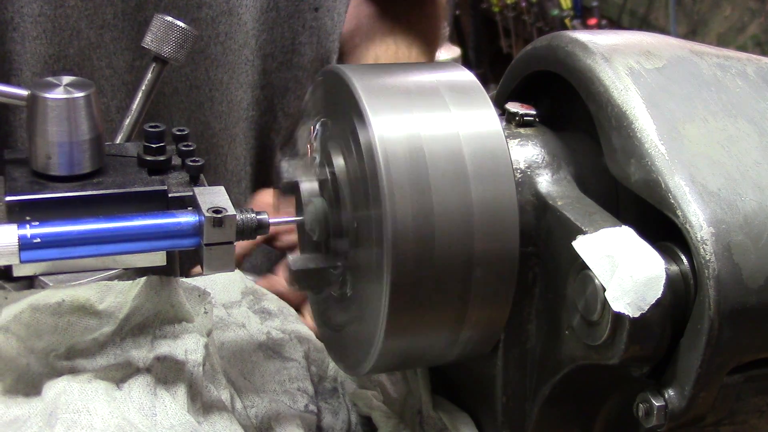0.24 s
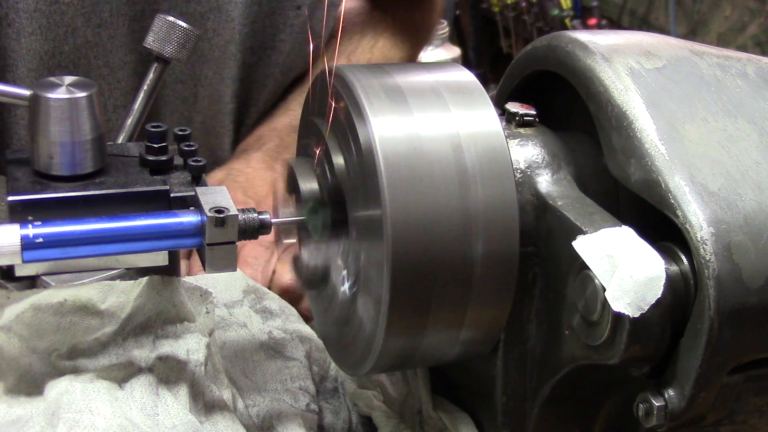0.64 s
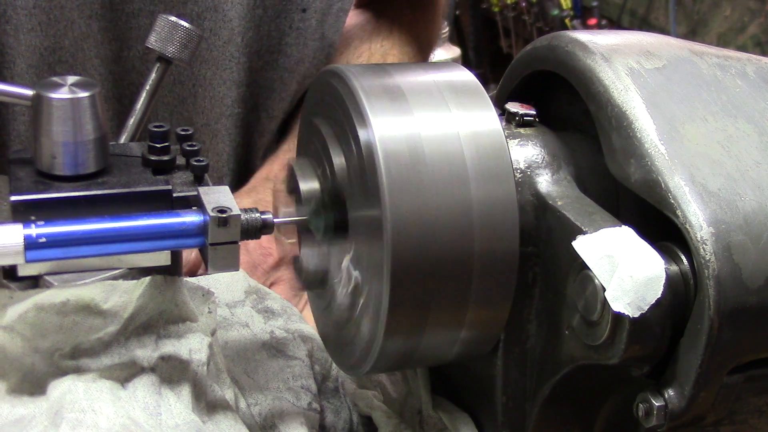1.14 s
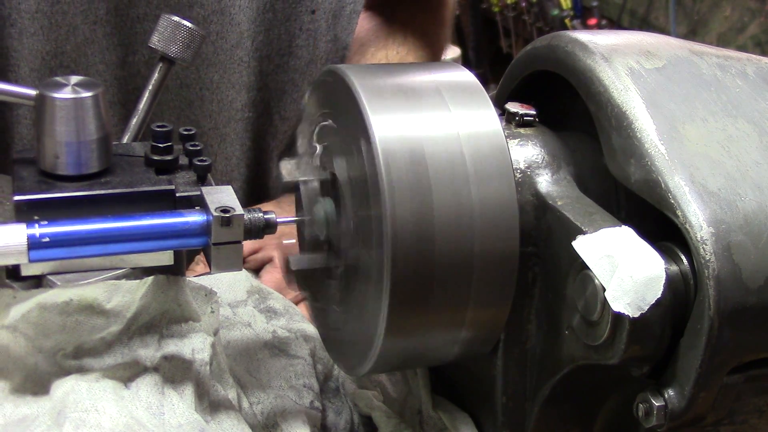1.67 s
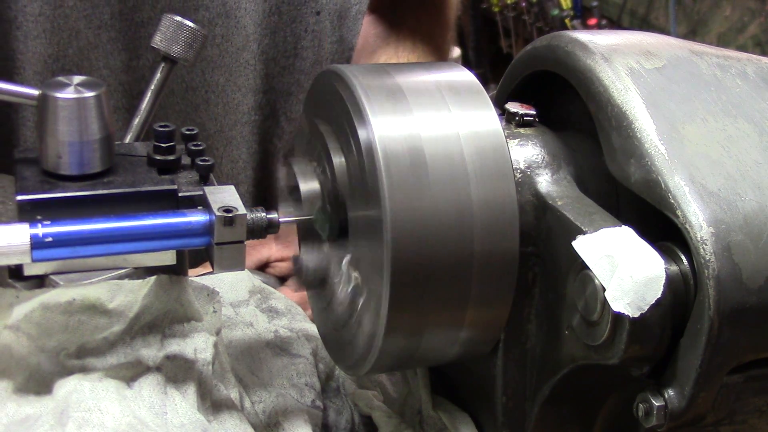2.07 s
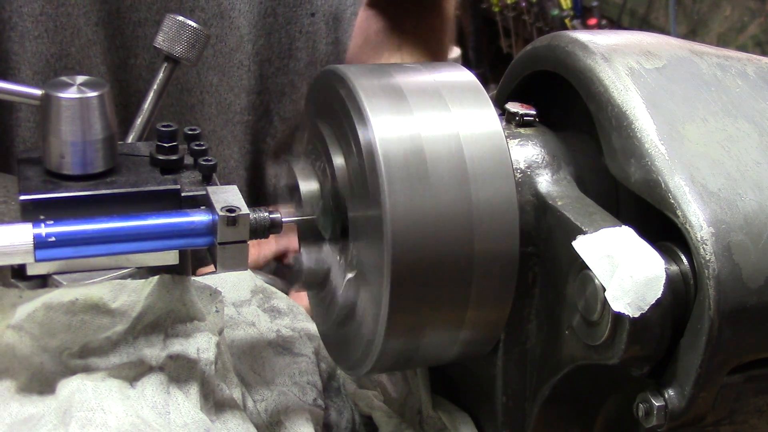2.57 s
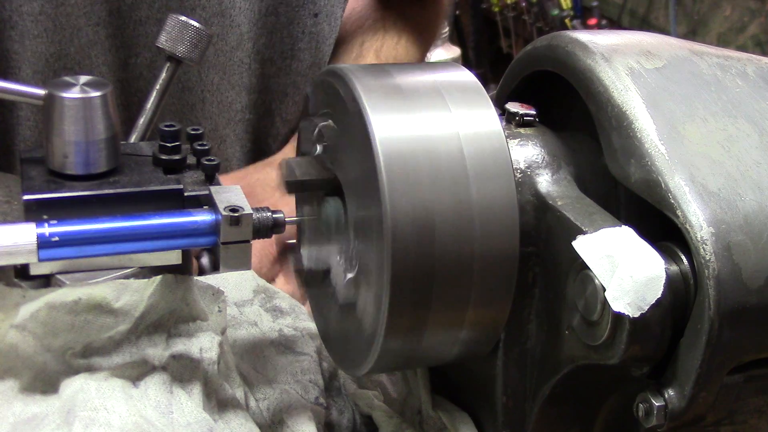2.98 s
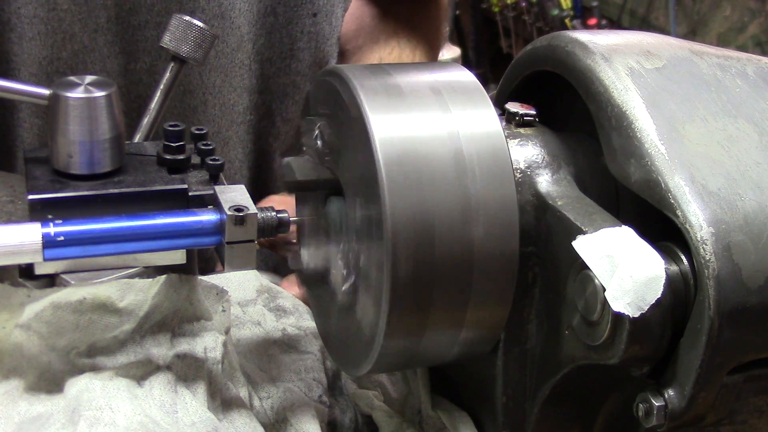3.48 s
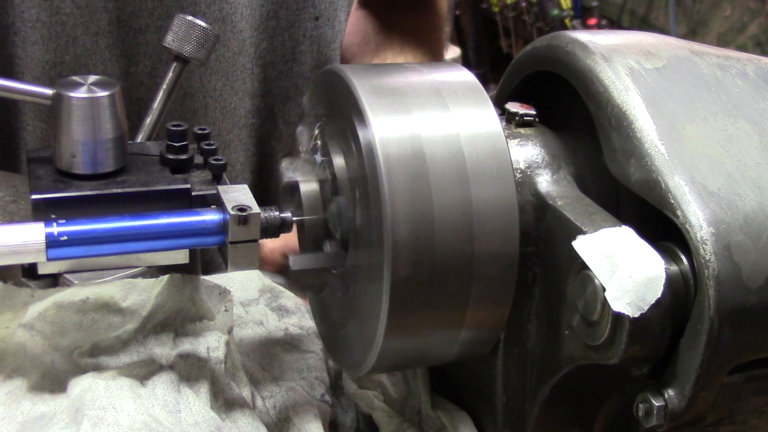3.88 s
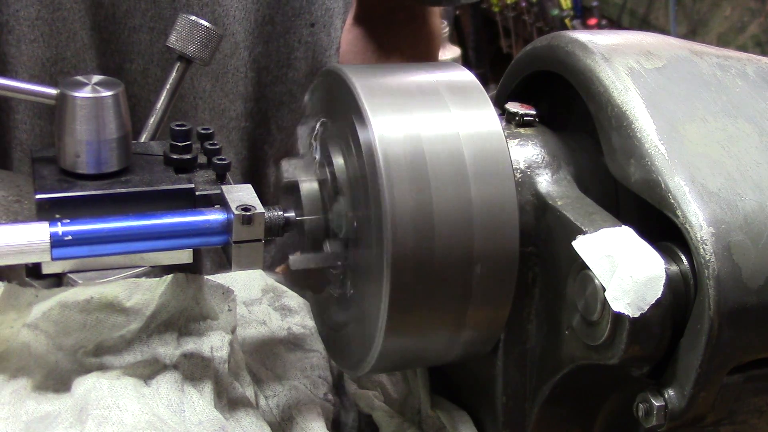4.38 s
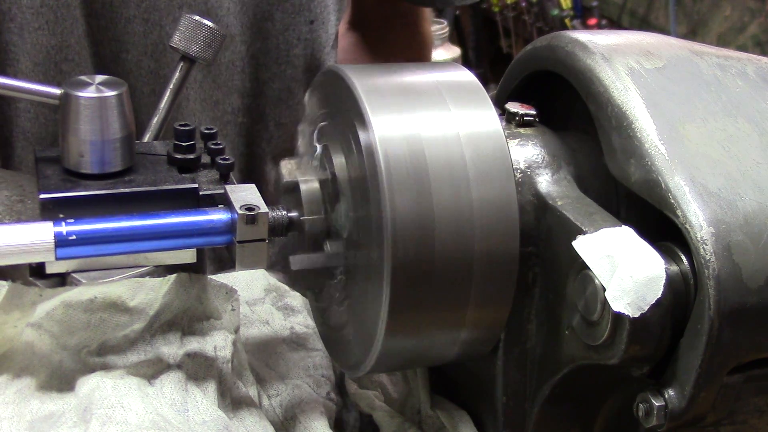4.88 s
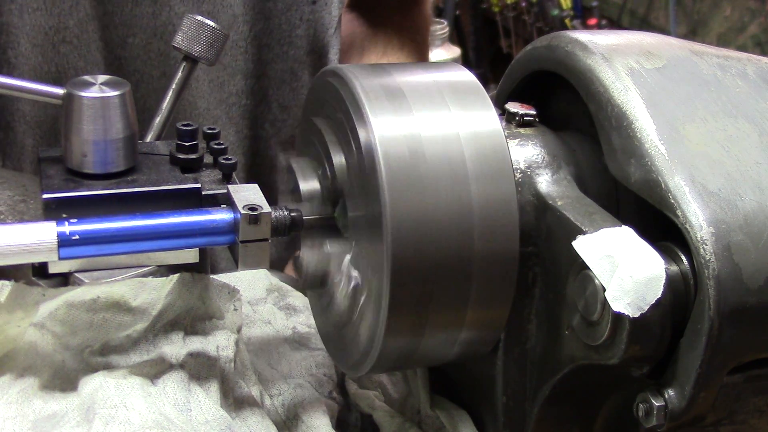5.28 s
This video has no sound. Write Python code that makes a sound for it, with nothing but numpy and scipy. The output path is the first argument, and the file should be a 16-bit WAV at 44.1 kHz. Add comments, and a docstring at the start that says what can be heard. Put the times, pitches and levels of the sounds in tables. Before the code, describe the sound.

A small air grinder whines shrilly and steadily with hissing exhaust over the low gear drone of a running lathe.

```python
"""Die grinder truing lathe chuck jaws

An air die grinder, clamped in a lathe's tool post, trues the jaws of the turning chuck.
Its rotor whines as a stack of tones on about 540 turns a second, over noise for the exhaust hiss.
For the first second or so the jaws brush and snag the stone and drag it down; then the cut lightens.
Underneath, the lathe drones in tones of its gear knock, with clattering teeth, mains hum and a rumble.
"""
import sys
import numpy as np
from scipy import signal
from scipy.fft import rfft, irfft, next_fast_len
from scipy.io import wavfile
from scipy.ndimage import uniform_filter1d

SR = 44100
rng = np.random.default_rng(int(sys.argv[2]) if len(sys.argv) > 2 else 0)


def unload_wav(signal):
    """Save mono or channel-first audio to the path in sys.argv[1] as 16-bit WAV at rate SR, clipped to [-1, 1]."""
    wavfile.write(
        sys.argv[1],
        SR,
        np.round(np.clip(np.atleast_2d(signal).T, -1, 1) * 32767).astype(np.int16),
    )


N = 243873
TIME = np.arange(N) / SR  # seconds


def gain_of(db):
    """Decibels to an amplitude factor."""
    return 10 ** (np.asarray(db) / 20)


def evened(x):
    """Scales a signal to an rms of one."""
    return x / np.sqrt(np.mean(x ** 2) + 1e-20)


def read_curve(points, hz):
    """Reads a table of (Hz, value) along a logarithmic frequency axis."""
    point_hz, value = np.transpose(points)
    return np.interp(np.log(hz + 1), np.log(point_hz + 1), value)


def wander(rate_hz, size=4096):
    """Smooth random drift of rms one, with little movement above the given rate."""
    hz = np.fft.rfftfreq(size, TIME[-1] / size)
    slow = irfft(rfft(rng.standard_normal(size)) / (1 + (hz / rate_hz) ** 2))
    return np.interp(TIME, np.linspace(0, TIME[-1], size), evened(slow))


def pair(tone, spread):
    """A complex tone of rms one reaches the two microphones a small phase angle apart."""
    left = tone.real - spread * tone.imag
    right = tone.real + spread * tone.imag
    return np.sqrt(2) * np.array([left, right])


# How alike the noise is at the two microphones.
# Each row: frequency in Hz, likeness of the two sides (1 = identical).
SIDE_LIKENESS = [(100, .99), (480, 0.97), (640, 0.9), (850, 0.87), (1450, 1), (1700, .999), (4500, .998),
                 (6000, 0.87), (10000, 0.98), (12000, 0.99), (14000, 0.92)]


def noise(spectrum, ripple_db):
    """Stereo noise of a given density; reflections off the machine ripple its spectrum."""
    size = next_fast_len(N, True)
    hz = np.fft.rfftfreq(size, 1 / SR)
    shared, apart = rfft(rng.standard_normal((2, size)))
    likeness = np.clip(read_curve(SIDE_LIKENESS, hz), 0, 1)
    middle = shared * np.sqrt((1 + likeness) / 2)
    side = apart * np.sqrt((1 - likeness) / 2)
    sides = middle + np.outer([1, -1], side)
    ripple = uniform_filter1d(rng.standard_normal(len(hz)), size=500)
    ripple = evened(uniform_filter1d(ripple, size=300))
    level_db = read_curve(spectrum, hz) + ripple_db * ripple
    return irfft(sides * gain_of(level_db), size)[:, :N] * np.sqrt(SR / 2)


# The running lathe and the shop around it.
# Each row: frequency in Hz, density in dB per Hz.
RUMBLE_SPECTRUM = [(20, -82), (50, -85), (85, -85), (115, -72), (155, -65.5), (195, -75), (290, -67.5),
                   (480, -64.5), (640, -69.5), (1100, -70), (1350, -73.5), (2000, -76), (4000, -88),
                   (9000, -105)]


def rumble(swell_db=2.0):
    """Low broadband noise of the lathe and shop, swelling unevenly."""
    return noise(RUMBLE_SPECTRUM, ripple_db=2.4) * gain_of(swell_db * wander(6.6))


# Mains hum of the lathe motor. One row: frequency in Hz, rms level in dB.
MOTOR_HUM = (120, -54.5)


def motor_hum():
    """The lathe motor hums as one steady sine."""
    hum_hz, hum_db = MOTOR_HUM
    return np.sqrt(2) * gain_of(hum_db) * np.sin(2 * np.pi * hum_hz * TIME)


# Loose gear teeth clattering. Each row: frequency in Hz, density in dB per Hz.
CLATTER_SPECTRUM = [(1000, -102), (1700, -75.5), (2150, -72), (2500, -97), (3500, -79)]


def clatter(knocks):
    """Noise of loose teeth, pulsing twice a knock because they touch on both flanks."""
    backlash = 1 + 0.3 * np.cos(4 * np.pi * knocks)
    return backlash * noise(CLATTER_SPECTRUM, ripple_db=1)


KNOCK_HZ = 53.953
# The lathe's drone. Each row: order as a multiple of the gear knock rate, level in dB.
GEAR_TONES = [(1, -64), (2, -42), (3, -53.5), (4, -39), (5, -41), (6, -49.5), (7, -40), (8, -26), (9, -22),
              (10, -33), (11, -42.5), (12, -46.5), (13, -33.5), (14, -47.5), (15, -36.5), (16, -42),
              (17, -40.5), (18, -59), (19, -42), (20, -48.5), (22, -44), (24, -51.5), (27, -47), (28, -47),
              (29, -49.5), (30, -48), (34, -60), (41, -53.5), (42, -46.5)]


def gears(waver=0.038, in_step=2.05, spread=0.018, widening=0.33):
    """Each gear knock rings the headstock: tones near its ring keep in step, others scatter.

    The quieter a tone, the wider it sits between the microphones.
    """
    knocks = KNOCK_HZ * TIME - .4 + .0012 * wander(4)  # count of knocks, slightly uneven
    ring_order, loudest_db = max(GEAR_TONES, key=lambda row: row[1])
    drone = np.zeros((2, N))
    for order, db in GEAR_TONES:
        looseness = np.clip((abs(order - ring_order) - 1) / in_step, 0, 1)
        scatter = looseness * rng.uniform(-0.49, 0.48)  # cycles
        tone = np.exp(2j * np.pi * (round(order) * knocks + scatter))
        width = spread * gain_of(widening * (loudest_db - db))
        drone += gain_of(db) * (1 + waver * wander(8)) * pair(tone, width)
    return drone + clatter(knocks)


def lathe():
    """The lathe's gears and motor hum over an uneven rumble."""
    return gears() + motor_hum() + rumble()


# Exhaust air and abrasive hiss, before the trim.
# Each row: frequency in Hz, density in dB per Hz.
HISS_SPECTRUM = [(80, -100), (900, -79), (2600, -70), (3500, -68.5), (5100, -65.5), (5500, -67.5),
                 (6200, -60), (7100, -65), (7750, -58.5), (8350, -57.5), (10200, -61), (11300, -64),
                 (12400, -73.5), (13900, -68), (15700, -83)]
HISS_TRIM_DB = 0.22
VANES = 3


def exhaust(turns, puff=.05, gust_db=0.2):
    """Steady air hiss that puffs as each rotor vane passes the port."""
    puffs = 1 + puff * np.cos(2 * np.pi * VANES * turns)
    return noise(HISS_SPECTRUM, ripple_db=1.0) * puffs * gain_of(HISS_TRIM_DB + gust_db * wander(27))


JAWS, CHUCK_HZ = 3, 5.35  # CHUCK_HZ in turns a second
# While the cut is heavy, every passing jaw brushes the stone and brakes the rotor.
FIRST_JAW_S, BRUSH_END_S, BRUSH_FADE_S = .04, 1.25, .3
BRUSH_LOSS_HZ, BITE_S = 1.3, .014  # BITE_S: from first touch to deepest drag
# Now and then a jaw snags the stone hard.
# Each row: time of the deepest drag in seconds, further speed lost in Hz.
HARD_SNAGS = [(.16, 1.7), (.292, 1.9), (.545, 1.9), (.61, .7), (.668, 1), (.73, 1.3), (.917, 2.9)]


def snag_sag():
    """Rotor speed lost to the jaws (Hz): each bites quickly and lets go more slowly."""
    passes = np.arange(FIRST_JAW_S, BRUSH_END_S, 1 / (JAWS * CHUCK_HZ))
    brushes = [(s, BRUSH_LOSS_HZ * min(1, (BRUSH_END_S - s) / BRUSH_FADE_S)) for s in passes]
    sag = np.zeros(N)
    for s, lost_hz in brushes + HARD_SNAGS:
        u = np.maximum((TIME - s) / BITE_S + 1, 0)
        sag += lost_hz * (u * np.exp(1 - u)) ** 2
    return sag


def choking(sag):
    """The whine dips as a jaw brakes the rotor, and swells just after as it picks up (Hz)."""
    drag = uniform_filter1d(sag, size=500) - uniform_filter1d(sag, size=6000)
    dip = np.interp(TIME + .003, TIME, drag)  # 3 ms early
    swell = .5 * np.interp(TIME - .018, TIME, drag)  # 18 ms late
    return dip - swell


def chuck_echo(rate_hz=32):
    """Sound thrown back by the spinning chuck: repeats each turn and each jaw, plus random drift."""
    coarse = TIME[::32]
    swing = np.zeros(len(coarse))
    for per_turn, size in ((1, .5), (3, 1), (6, .6)):
        swing += size * np.cos(2 * np.pi * (per_turn * CHUCK_HZ * coarse + rng.random()))
    return np.interp(TIME, coarse, swing) + wander(rate_hz) + 1j * wander(rate_hz)


WORKING_HZ = 538
# The strong rotor tones; each fades near one speed, where its echo off the machine cancels it.
# Each row: order as a multiple of rotor speed, level in dB at working speed before the fade,
# slope in dB per Hz faster, speed of the fade in Hz, its depth in dB, its width in Hz,
# choke in dB per Hz of braking.
STRONG_TONES = [(3, -27.5, -0.23, 537.7, 5.5, 1.66, .2), (6, -15.5, -0.99, 535.1, 11, 2.07, 2.2),
                (9, -19.5, .3, 541.8, 10.5, 2.6, .2), (15, -22, 0.23, 535.5, 1.5, 1.5, 2.5)]


def strong_tones(speed_hz):
    """(order, dB, choke) of each strong tone: its level follows the rotor's speed."""
    tones = []
    for order, db, slope, fade_hz, depth_db, width_hz, choke in STRONG_TONES:
        fade_db = depth_db * np.exp(-((speed_hz - fade_hz) / width_hz) ** 2)
        tones.append((round(order), db + slope * (speed_hz - WORKING_HZ) - fade_db, choke))
    return tones


# Rotor speeds in a heavy cut, in a light cut and running almost free, each in Hz.
CUT_SPEEDS_HZ = (535.8, 538.5, 541.5)
# The weaker rotor tones. Each row: order as a multiple of rotor speed, level in dB in a heavy cut,
# level in dB in a light cut, level in dB running almost free.
WEAK_TONES = [(1, -35, -31, -32), (2, -48, -47.5, -46), (4, -48, -48.5, -47), (5, -32, -37, -40.5),
              (7, -44.5, -42, -42), (8, -80, -63, -53), (10, -35.5, -40.5, -40), (11, -32, -33.5, -34),
              (12, -36.5, -35, -34.5), (13, -40, -33.5, -31.5), (14, -38, -34, -36), (16, -30, -30.5, -37),
              (17, -41, -39, -37), (18, -54, -39, -37), (19, -37, -45, -44), (20, -50, -51, -47),
              (21, -31.5, -36, -45), (22, -51, -52, -45), (23, -49, -45, -45), (24, -49, -45, -40),
              (27, -44, -45, -41), (28, -57, -50, -49)]


def whine(speed_hz, sag, turns, flutter=0.077, weak_flutter=0.18, weak_choke=0.2, spread=0.12):
    """The rotor chops the air into a stack of tones; within each group, high ones flutter most."""
    settled_hz = uniform_filter1d(speed_hz - sag, size=2000)  # smoothed: echoes take a moment to follow
    tones = [(order, db, flutter, choke) for order, db, choke in strong_tones(settled_hz)]
    top_order = max(order for order, *_ in tones)
    for order, *cut_dbs in WEAK_TONES:
        db = np.interp(speed_hz, CUT_SPEEDS_HZ, cut_dbs)
        tones.append((round(order), db, weak_flutter, weak_choke))
    braking = choking(sag)
    out = np.zeros((2, N))
    for order, db, depth, choke in tones:
        height = order / top_order
        # the lowest tone is the shaft's own swing and gets no offset; it beats with the gears
        offset = rng.random() * (order > 1)
        tone = np.exp(2j * np.pi * (order * turns + offset))
        tone = tone * (1 + depth * height ** 0.72 * chuck_echo())
        out += gain_of(db - choke * braking) * pair(tone, spread * height)
    return out


START_TURNS = .43
# The rotor speeds up, unsteadily, as the cut lightens.
# Each row: time in seconds, speed in Hz before the jaws' drag.
ROTOR_SPEED = [(0.0, 534.8), (0.12, 536.8), (0.58, 535.0), (1.12, 536.2), (1.2, 537.7), (1.67, 536.1),
               (1.76, 539.1), (1.88, 537.9), (2.07, 537.7), (2.19, 540.2), (2.43, 539.3), (2.69, 540.9),
               (2.88, 538.2), (3.2, 538.6), (3.48, 540.1), (3.57, 537.9), (3.94, 539.6), (4.14, 538.0),
               (4.32, 539.9), (4.45, 538.7), (4.83, 538.9), (5.11, 541.8), (5.53, 542.0)]


def grinder():
    """One rotor speed, less the jaws' drag, turns both the whine and the exhaust."""
    speed_hz = np.interp(TIME, *np.transpose(ROTOR_SPEED))
    sag = snag_sag()
    jitter = 0.0041 * wander(13)  # turns; the stone never runs quite evenly
    turns = START_TURNS + np.cumsum(speed_hz - sag) / SR + jitter
    return whine(speed_hz, sag, turns) + exhaust(turns)


def scene():
    """The lathe drones under the grinder, both close by."""
    return lathe() + grinder()


CUTOFF_HZ = 15800
# Lean of the microphone pair. Each row: frequency in Hz, left minus right in dB.
STEREO_LEAN = [(100, -.3), (400, -.15), (1500, 0), (2500, 1.5), (4800, 1.2), (8100, 1.7), (12000, 2.5)]


def record(dry):
    """The microphones drop the deep bass and lean the treble left; then comes the band limit."""
    size = next_fast_len(N, True)
    hz = np.fft.rfftfreq(size, 1 / SR)
    lean_db = read_curve(STEREO_LEAN, hz)
    low_cut = hz ** 2 / np.hypot(hz ** 2, 55 ** 2)  # corner at 55 Hz
    sides = gain_of([lean_db / 2, -lean_db / 2])
    heard = irfft(rfft(dry, size) * low_cut * sides, size)[:, :N]
    band_limit = signal.firwin(601, CUTOFF_HZ, window=("kaiser", 9), fs=SR)
    return signal.oaconvolve(heard, band_limit[None], "same")


dry = scene()
out = record(dry)
unload_wav(out)
```